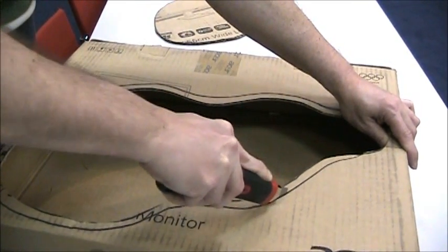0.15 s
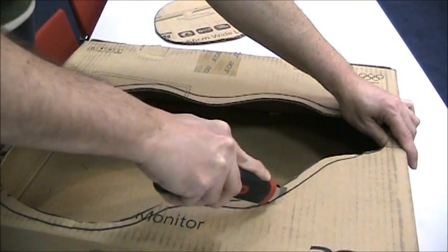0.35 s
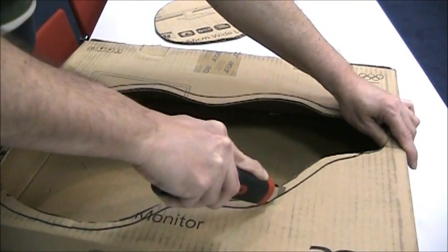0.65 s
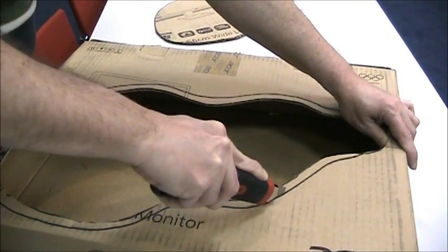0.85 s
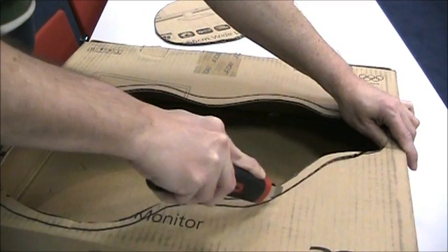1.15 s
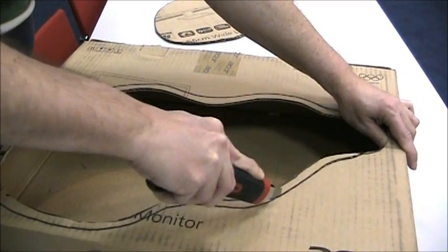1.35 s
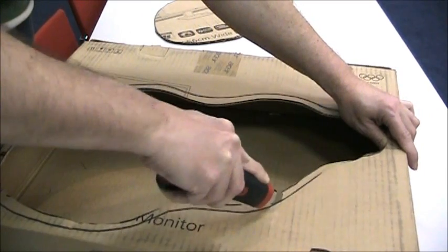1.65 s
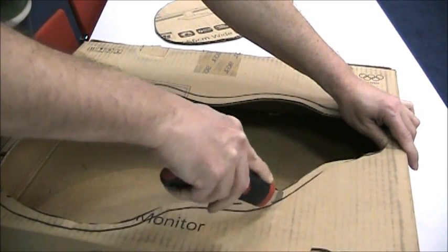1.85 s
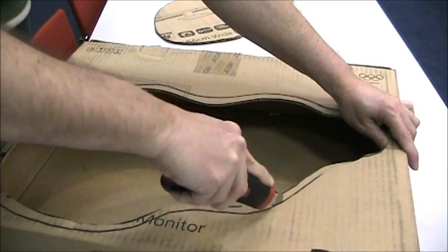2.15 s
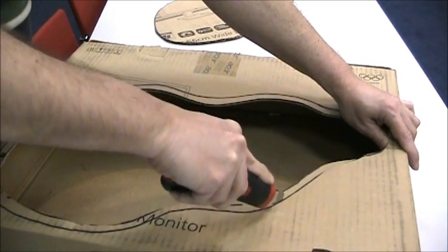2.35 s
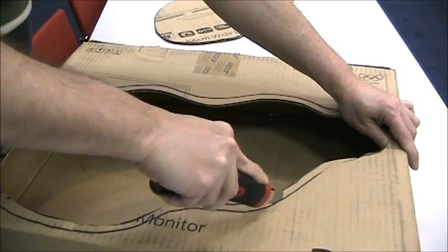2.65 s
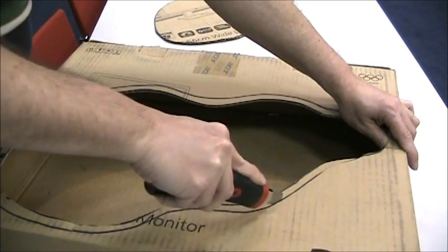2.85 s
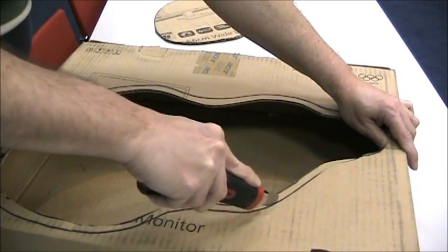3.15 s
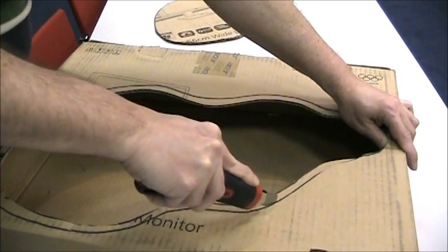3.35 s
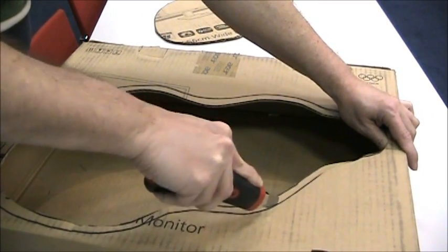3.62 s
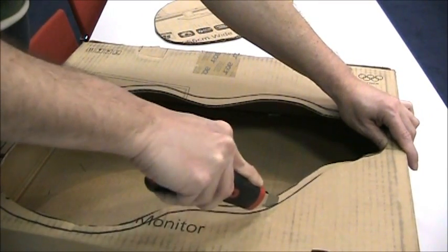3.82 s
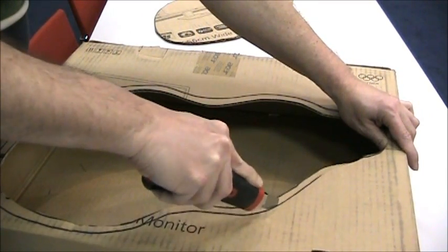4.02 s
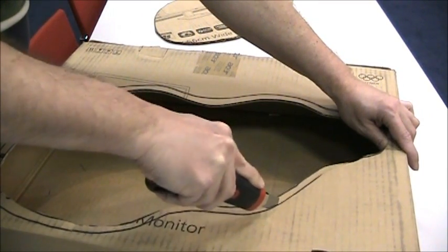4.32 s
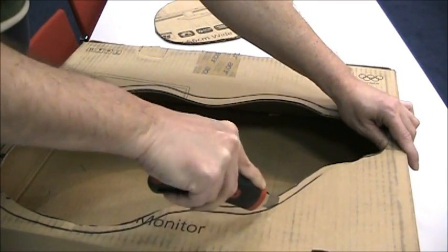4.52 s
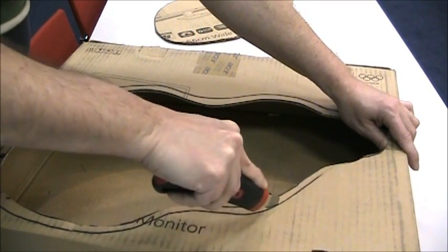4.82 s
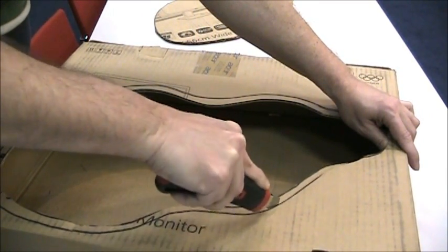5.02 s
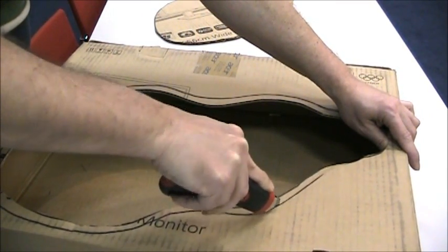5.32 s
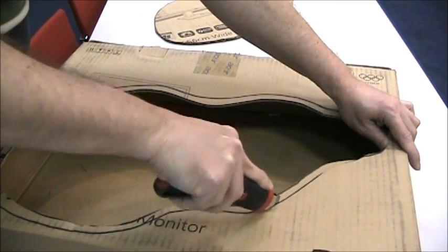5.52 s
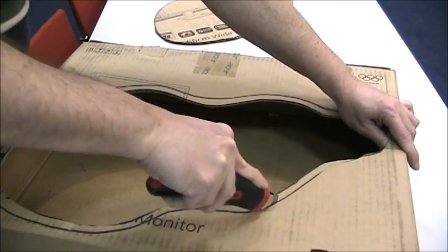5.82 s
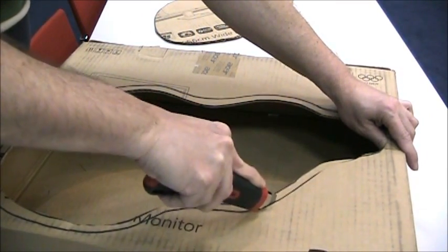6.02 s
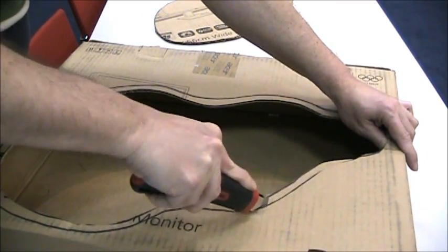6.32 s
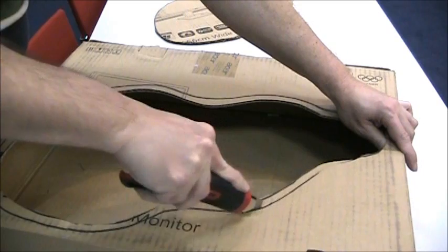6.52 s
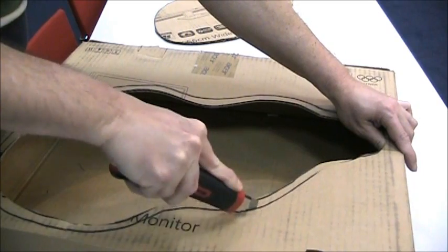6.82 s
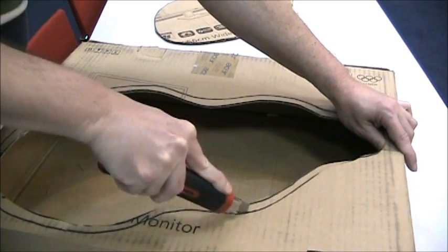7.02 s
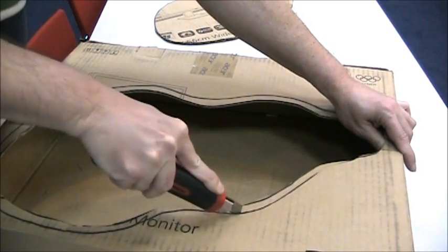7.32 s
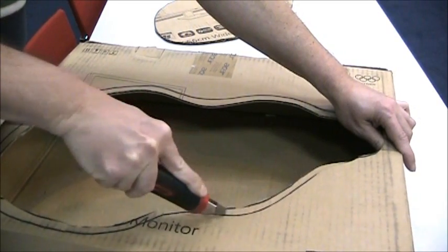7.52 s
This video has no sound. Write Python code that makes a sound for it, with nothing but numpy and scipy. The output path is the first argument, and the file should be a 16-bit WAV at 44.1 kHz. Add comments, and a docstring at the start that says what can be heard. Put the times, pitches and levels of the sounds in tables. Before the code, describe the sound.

Small snaps and creaks as a blade works through a big hollow cardboard box, then louder ripping strokes and deep thuds near the end.

```python
"""A small room, a stereo microphone held close to a large, hollow corrugated cardboard box.
A utility knife saws into it: dense random ruptures of paper fibre rasp, hiss and ring the box's modes.
Flute walls crack (noise bursts) and thump (decaying box modes); torn strips twang, the wedged blade groans.
Hands flex the board (fibre ruptures through a low colour) over room air, hum, a thin electrical whine,
and wavering recorder hiss and low rumble that follow the recorder's gain. The loudest peaks are rounded."""
import sys
import numpy as np
from scipy import signal
from scipy.fft import rfft, irfft, next_fast_len
from scipy.io import wavfile

SR = 44100
rng = np.random.default_rng(int(sys.argv[2]) if len(sys.argv) > 2 else 0)


def transcribe(signal):
    """Save signal, clipped to [-1, 1], as a 16-bit WAV file at the path in sys.argv[1]."""
    frames = np.atleast_2d(signal).T
    limited = np.clip(frames, -1, 1)
    pcm = np.round(limited * 32767).astype(np.int16)
    wavfile.write(sys.argv[1], SR, pcm)


N = 338247
TIME = np.arange(N) / SR

# modes of the panels and cavity: (frequency [Hz], relative level [dB], T60 of the free ring [s])
BOX_MODES = [(144.3, -2.5, 0.13), (173.6, -9, 0.22), (191.3, -3.5, 0.13), (237.6, 1.5, 0.09),
             (298.7, -3, 0.16), (339, -13, 0.15), (397.6, -2, 0.12), (448.3, -0.5, 0.088), (538, 4, 0.029),
             (589, -1, 0.057), (659, 1.5, 0.058), (726, 6.5, 0.033), (819.7, -2.5, 0.062), (934, -1, 0.036),
             (1126, -12, 0.038), (1291, -11, 0.052)]
# colour of breaking fibres: (frequency [Hz], relative density [dB per Hz])
CRACK_COLOUR = [(300, -13.5), (1000, 1), (2000, 4.5), (3000, -4.5), (5000, -2), (8000, -1.5), (11000, -6),
                (15500, -14)]
# the blade forces a flute wall ever harder until it gives:
# (start [s], break [s], tearing at the break [dB], thump peak [dB])
SURGES = [(2.996, 3.005, -29.5, -12), (6.134, 6.158, -18.5, -7), (6.453, 6.464, -27, -32),
          (6.498, 6.532, -22, -7.5), (6.92, 6.94, -20, -5), (6.957, 6.973, -24.5, -20),
          (7.41, 7.424, -11.5, -10), (7.449, 7.463, -13.5, -5.5)]
# flexing of the held board, and recorder hiss rising and falling with the recorder's gain:
# (time [s], flexing level ahead of flex_db [dB], hiss level ahead of hiss_db [dB])
FLEX_AND_HISS = [(0.0, -40.5, -54), (0.83, -43.5, -52), (1.15, -38, -49.5), (1.75, -41.5, -53),
                 (2.22, -43, -52), (2.88, -36.5, -50.5), (3.27, -39, -51.5), (3.5, -35, -50.5),
                 (4.64, -38.5, -47), (4.93, -37.5, -58.5), (5.94, -47, -58.5), (6.3, -41, -56),
                 (6.86, -40.5, -55.5), (7.01, -49, -55), (7.18, -43.5, -55), (7.37, -36.5, -47),
                 (7.54, -39, -55), (7.67, -34.5, -46)]


def amp(db):
    """Decibels to gain."""
    return 10 ** (np.asarray(db) / 20)


def rms_one(x):
    """Scale to unit power."""
    return x / np.sqrt(np.mean(x ** 2) + 1e-20)


def at_hz(points, hz):
    """Read a table on a log-frequency axis."""
    points = np.array(points)
    return np.interp(np.log(np.maximum(hz, 1)), np.log(points[:, 0]), points[:, 1])


def level(rows, column=1):
    """Gain over time from a dB column, practically silent outside the rows."""
    rows = np.array(rows)
    return amp(np.interp(TIME, rows[:, 0], rows[:, column], left=-120, right=-120))


def add(track, s, sound):
    """Mix a short sound into a track at s seconds."""
    start = int(np.clip(s * SR, 0, N - 1))
    track[start:start + len(sound)] += sound[:N - start]


def drift(rate):
    """Random motion with spread 1, through a new random value rate times a second."""
    knots = rng.standard_normal(N // 8)
    return rms_one(np.interp(TIME * rate, np.arange(len(knots)), knots))


def decay(t, t60):
    """Exponential decay by 60 dB in t60 seconds."""
    return np.exp(-np.log(1000) * t / t60)


def colour(x, spectrum, size=4096):
    """Causal (minimum-phase) filter with the given spectrum, by folding its cepstrum."""
    log_gain = np.log(amp(at_hz(spectrum, np.fft.rfftfreq(size, 1 / SR))))
    cepstrum = irfft(log_gain)
    cepstrum[1:size // 2] *= 2
    cepstrum[size // 2 + 1:] = 0
    impulse = irfft(np.exp(rfft(cepstrum)))
    return signal.oaconvolve(x, impulse)[:len(x)]


def noise(spectrum):
    """Steady noise of the given colour, unit power."""
    return rms_one(colour(rng.standard_normal(N), spectrum))


def diffuse(mid, side):
    """Stereo pair from two unrelated sounds: narrow in the bass, wide above."""
    # share of the side signal: (frequency [Hz], gain [dB])
    side_share = [(100, -17), (300, -5.5), (700, -2), (1500, 4.5), (5000, 2), (14000, -2.5)]
    return mid + colour(side, side_share) * np.array([[1], [-1]])


def fibres(per_s, spread_db):
    """Randomly timed ruptures of uneven strength and either sign, unit power."""
    sizes = amp(spread_db * np.minimum(rng.exponential(1, N), 4)) * rng.choice([-1, 1], N)
    return rms_one(sizes * (rng.random(N) < per_s / SR))


def background(air_db=-54, hum_hz=120, hum_db=-53, whine_db=-67):
    """Quiet room air as diffuse noise, a low hum and a thin electrical whine as steady sines."""
    # colour of the room air: (frequency [Hz], relative density [dB per Hz])
    air_colour = [(20, -37), (50, 0), (80, -19), (100, -10), (135, 0.5), (180, -0.5), (400, -13.5),
                  (800, -6), (1300, -20.5), (3000, -23.5), (8000, -30), (15500, -44)]
    whine_hz = 15734
    air = amp(air_db) * diffuse(noise(air_colour), noise(air_colour))
    hum = amp(hum_db) * rms_one(np.sin(2 * np.pi * hum_hz * TIME))
    whine = amp(whine_db) * rms_one(np.sin(2 * np.pi * whine_hz * TIME))
    return air + hum + whine


def rumble(rumble_db=4.5):
    """Low rumble around 60 to 125 Hz as shaped noise, its level following the recorder's gain."""
    # (time [s], level ahead of rumble_db [dB])
    rumble_level = [(0.0, -55.5), (1.24, -51), (1.6, -59), (2.65, -51.5), (4.53, -48.5), (4.76, -59),
                    (5.55, -65), (7.37, -56), (7.48, -51), (7.67, -57)]
    # (frequency [Hz], relative density [dB per Hz])
    rumble_colour = [(20, -34), (42, -31), (60, 7.5), (76, 10.5), (100, 2), (125, 11), (180, -21),
                     (500, -47)]
    return level(rumble_level) * amp(rumble_db) * noise(rumble_colour)


def recorder_hiss(hiss_db=-0.5, tick_db=-4.0, waver_db=3.75):
    """Wide, wavering noise that rises and falls with the recorder's gain, with stray ticks in it."""
    # (frequency [Hz], relative density [dB per Hz])
    floor_colour = [(500, 1), (1200, 8.5), (2200, 3.5), (3000, 2), (5000, 0), (8500, -2.5), (12000, -9.5),
                    (15500, -12.5)]
    hiss = amp(hiss_db) * diffuse(noise(floor_colour), noise(floor_colour))
    # the ticks come in clumps
    clumps = amp(3.0 * drift(25) + 5.0 * drift(180))
    grains = fibres(per_s=700, spread_db=3.5) * clumps
    ticks = amp(tick_db) * rms_one(colour(grains, CRACK_COLOUR))
    waver = amp(waver_db * (drift(22) - .5))
    return level(FLEX_AND_HISS, 2) * waver * (hiss + ticks)


def flexing(flex_db=-0.5):
    """The held board groans all over its surface as it flexes: wavering fibre ruptures, mostly low."""
    # (frequency [Hz], relative density [dB per Hz])
    flex_colour = [(60, -20.5), (100, -12), (135, 3), (200, -0.5), (290, -3), (345, -9), (440, -3.5),
                   (560, -12), (740, -11), (950, -15.5), (1400, -25), (2200, -25), (3500, -37.5)]
    waver = amp(1.8 * drift(30))
    strains = [fibres(per_s=2500, spread_db=2.5) for _ in range(2)]
    flex = diffuse(*[rms_one(colour(strain, flex_colour)) for strain in strains])
    return level(FLEX_AND_HISS) * amp(flex_db) * waver * flex


def stroke(bite_s, end_s, attack_s):
    """Envelope of one stroke: the blade bites in, holds, lets go and drags on a little in the slit."""
    attack_rise_db = 22.5   # gained over the attack
    release_s, drag_s = 0.0083, 0.029   # time constants
    drag = amp(-8)
    rise = amp(attack_rise_db * np.clip((TIME - bite_s) / attack_s, -10, 0))
    after = np.clip(TIME - end_s, 0, 1)
    return rise * ((1 - drag) * np.exp(-after / release_s) + drag * np.exp(-after / drag_s))


def box(force, tilt_db=3.0):
    """The box's modes, as resonators, ring under a steady force, higher ones more readily; unit power."""
    out = np.zeros(N)
    for k, (hz, db, t60) in enumerate(BOX_MODES):
        r = amp(-60 / (t60 * SR))   # pole radius
        w = 2 * np.pi * hz / SR
        gain = (-1) ** k * amp(db + tilt_db * np.log2(hz))
        # the tiny offset keeps the filter off denormal numbers
        out += gain * signal.lfilter([1, 0, -1], [1, -2 * r * np.cos(w), r * r], force + 1e-18)
    return rms_one(out)


def sawing(hiss_db=0.5, surge_start=0.28, catch_db=1.14):
    """The blade rips fibres in a dense, catching stream that rasps, hisses and shakes the box."""
    # sawing strokes: (full bite [s], end [s], attack [s], tearing [dB],
    # drive into the box over the tearing [dB], edge hiss over the tearing, ahead of hiss_db [dB])
    strokes = [(0.002, 0.007, 0.0057, -46.5, 14, -5), (0.254, 0.264, .01, -52, 9, -5),
               (0.421, 0.469, 0.0088, -34.5, 5.5, -4.5), (0.554, 0.556, .02, -41, 9.5, -3),
               (0.608, 0.658, .01, -53, 7, 1),           (1.056, 1.093, 0.095, -29, 8, -1.5),
               (1.135, 1.158, .03, -42.5, 8.5, -5), (1.388, 1.443, .09, -39.5, -3, 5.5),
               (2.367, 2.433, .02, -44, 6, -2.5), (2.929, 2.994, 0.11, -23, 7.5, -3),
               (3.421, 3.475, 0.032, -31.5, 0, -1), (3.606, 3.624, 0.061, -39, 12, -8),
               (3.968, 4.07, 0.034, -44, 8, -2.5), (4.24, 4.265, .04, -54, -6, 8.5),
               (4.349, 4.378, .01, -37.5, -2, -7.5), (4.67, 4.696, 0.033, -52, 2, 6),
               (6.097, 6.163, 0.036, -29, 6.5, -2), (6.386, 6.406, .02, -46.5, 7, -6),
               (6.452, 6.534, 0.016, -27.5, 8, -1), (6.54, 6.575, .02, -31.5, 4, -5.5),
               (6.861, 7.007, 0.013, -32.5, 4.5, -1.5), (6.926, 6.938, .03, -16, -3, -3),
               (7.079, 7.113, 0.088, -24.5, 3.5, -3), (7.13, 7.136, .006, -25.5, 3, -2.5),
               (7.344, 7.385, 0.049, -35.5, 4.5, -4), (7.392, 7.561, .004, -21.5, 2, -3.5),
               (7.662, 7.68, 0.046, -31.5, 2, -6)]
    # rasp of the liner, hiss at the blade's edge: (frequency [Hz], relative density [dB per Hz])
    rasp_colour = [(300, -26.5), (650, 6.5), (850, 10), (1400, -2.5), (1700, 2.5), (1950, 8.5), (2100, 4),
                   (2300, 8), (2500, 1), (2800, 1), (4000, -14), (7000, -21), (15000, -38.5)]
    hiss_colour = [(1500, -23.5), (3200, -7.5), (5000, -9.5), (6300, -10), (7400, -4.5), (8400, -3.5),
                   (10500, -11), (12500, -10.5), (15500, -24.5)]

    effort, edge, drive = np.zeros((3, N))
    for bite_s, end_s, attack_s, db, grip_db, edge_db in strokes:
        push = amp(db) * stroke(bite_s, end_s, attack_s)
        effort = np.maximum(effort, push)
        edge = np.maximum(edge, amp(edge_db) * push)
        drive = np.maximum(drive, amp(grip_db) * push)
    for start, stop, db, _ in SURGES:
        surge = amp(db) * np.interp(TIME, [start, stop], [surge_start, 1], left=0, right=0)
        effort += surge
        edge += surge
        drive += surge

    ruptures = fibres(per_s=4500, spread_db=3.5) * amp(2.8 * drift(450))
    # bundles of fibres hold, then go together
    ruptures = ruptures * amp(catch_db * (drift(90) - 2.4))
    rasp = effort * rms_one(colour(ruptures, rasp_colour))
    edge_noise = ruptures + .5 * rng.standard_normal(N)
    hiss = amp(hiss_db) * edge * rms_one(colour(edge_noise, hiss_colour))
    # the heavy panels follow the blade 4.4 ms late
    lag = np.exp(-1 / (0.0044 * SR))
    shake = signal.lfilter([1 - lag], [1, -lag], drive) * box(ruptures)
    return rasp + hiss + shake


def strays(count=60, per_s=4):
    """Rows like those of the snaps, for faint stray fibres at random times, set against the hiss level."""
    over_hiss_db, spread_db = -4.5, 7.5
    bright_db, t60_s, thump_over_crack_db = 20, 0.031, -3.5
    times = np.cumsum(rng.uniform(.2, 1.8, count)) / per_s
    chance = rng.standard_normal((count, 2))
    rows = np.array(FLEX_AND_HISS)
    levels = np.interp(times, rows[:, 0], rows[:, 2]) + over_hiss_db + spread_db * chance[:, 0]
    return [(s, db, bright_db + spread_db * tilt, t60_s, db + thump_over_crack_db)
            for s, db, tilt in zip(times, levels, chance[:, 1]) if s < N / SR]


def crack(bright_db, t60, scatter_db=-3.0, tail_db=-27, tail_s=0.031, rise_s=0.000055,
          neutral_db=2.0, size=5000):
    """A bundle of fibres breaks in a noise burst, stragglers follow as a faint tail; unit power over 10 ms."""
    t = np.arange(size) / SR
    fade = decay(t, t60) + amp(tail_db) * np.exp(-t / tail_s)
    burst = rng.standard_normal(size) * fade * (1 - np.exp(-t / rise_s))
    tone = []
    for hz, db in CRACK_COLOUR:
        tilt_db = (bright_db - neutral_db) * np.log2(np.clip(hz, 1500, 8000)) / 2
        tone.append((hz, db + tilt_db + scatter_db * rng.standard_normal()))
    sound = colour(burst, tone)
    return sound / np.sqrt(np.sum(sound ** 2) / (.01 * SR))


def thump(centre_hz, focus_db=1.0, scatter_db=1.5, swell_cycles=0.61, hold=0.96, size=12000):
    """The board springs back: the liner near the cut answers first, slow panels swell later. Peak 1."""
    t = np.arange(size) / SR
    hz, db, t60 = np.array(BOX_MODES).T[:, :, None]
    off_centre = np.log2(hz / centre_hz)   # octaves
    strength = amp(db - focus_db * off_centre ** 2 + scatter_db * rng.standard_normal(hz.shape))
    # the pressing hand shortens the ring
    envelope = (1 - np.exp(-t * hz / swell_cycles)) * decay(t, hold * t60)
    modes = np.sin(2 * np.pi * (hz * t + rng.random(hz.shape)))
    sound = np.sum(strength * envelope * modes, axis=0)
    return sound / np.abs(sound).max()


def snapping(thump_db=5.5, release_hz=260, strain_db=-13.0, strain_s=0.002, size=500):
    """Fibres strain just before a wall gives way; then it cracks and the board springs back."""
    # flutes snapping: (time [s], crack level over 10 ms [dB], brightness [dB], crack T60 [s],
    # thump peak ahead of thump_db [dB])
    snaps = [(0.092, -47, -1, .014, -38), (0.3388, -48, 14, .019, -53), (0.4194, -24.5, 4, 0.054, -52),
             (0.778, -42, 9, .014, -34), (0.9277, -26, 8, 0.065, -33), (1.0077, -28, 3, 0.017, -19),
             (1.286, -39.5, 6, 0.039, -33), (1.3913, -28, 2, .05, -28), (1.4046, -18, 7, 0.014, -17),
             (1.633, -47, -7, 0.013, -34), (1.7095, -39.5, 9, 0.029, -50), (1.8621, -44, -17, .03, -53),
             (1.9073, -44, 2, 0.038, -36), (2.149, -26.5, -6.5, 0.025, -15), (2.374, -29, -3, 0.053, -17.5),
             (2.4154, -32, -6, 0.023, -14.5), (2.6214, -29.5, -1, .022, -18),
             (2.7036, -30, -2.5, 0.027, -13), (3.134, -34, -14, .03, -30.5), (3.3003, -37, -17, 0.042, -33),
             (3.39, -31.5, 7, .027, -36.5), (3.4088, -30, 1, 0.028, -41), (3.465, -21, -1, 0.056, -22),
             (3.5594, -24, 0, 0.031, -48), (3.8222, -35.5, -3, 0.098, -33), (3.945, -35.5, -4, .024, -27.5),
             (3.9579, -34, -4, 0.016, -32), (3.9885, -45, -15, 0.018, -22.5), (4.0296, -36, -5, .024, -24),
             (4.0773, -24.5, 3.5, 0.018, -29), (4.1852, -34.5, 15, 0.033, -54), (4.221, -40, -9, .024, -47),
             (4.3309, -28.5, -1.5, 0.04, -25.5), (4.379, -37, 2, 0.024, -42),
             (4.5885, -32, -5.5, 0.017, -47), (4.6222, -25.5, -1, 0.022, -30),
             (4.7771, -27, 11, 0.013, -27), (4.7813, -13, 7.5, 0.015, -14), (5.0128, -25, 4, 0.038, -18.5),
             (5.022, -19, 6, 0.014, -14.5), (5.0784, -34, -10, .026, -28.5), (5.1967, -48, 2, .017, -27),
             (5.2175, -41.5, -3, 0.014, -33), (5.2641, -15.5, 10, 0.014, -18),
             (5.562, -30.5, -3.5, 0.0094, -19), (5.696, -39, -8, .023, -30.5),
             (5.9895, -48, 10, 0.013, -40.5), (6.807, -37, 7, 0.23, -37), (6.8586, -35, 19, .023, -30),
             (7.1277, -21.5, -1, 0.015, -13), (7.2548, -40.5, 9, 0.0064, -34),
             (7.3945, -17.5, -1, .021, -13.5)]
    # a harder crack springs the stiffer, higher panels
    middling_thump_hz, middling_crack_db, crack_db_per_octave = 470, -34.5, 25
    # brittle, bright breaks let the board ring for less time
    plain_hold, bright_db_per_halving = 0.91, 16.5   # hold: share of the free ring

    out = np.zeros(N)
    t = np.arange(size) / SR
    for s, db, bright_db, t60, body_db in list(snaps) + strays():
        body_hz = middling_thump_hz * 2 ** ((db - middling_crack_db) / crack_db_per_octave)
        hold = plain_hold * .5 ** (max(bright_db, 0) / bright_db_per_halving)
        fibre_noise = rms_one(colour(rng.standard_normal(size), CRACK_COLOUR))
        strain = fibre_noise * np.exp(-t[::-1] / strain_s)   # grows up to the break
        add(out, s - size / SR, amp(db + strain_db) * strain)
        add(out, s, amp(db) * crack(bright_db, t60))
        add(out, s - .0005, amp(body_db + thump_db) * thump(body_hz, hold=hold))
    # walls forced by the blade: the thump starts 3 ms ahead of the break
    for _, stop, _, body_db in SURGES:
        add(out, stop - .003, amp(body_db) * thump(release_hz))
    return out


def twanging(size=2000):
    """Strips of liner twang briefly as they tear free: decaying sines, too small to fill the room."""
    # (time [s], pitch [Hz], starting level [dB], T60 [s])
    twangs = [(0.93, 2320, -27, 0.059), (1.405, 2980, -16.5, 0.034), (4.332, 3820, -13, 0.0068),
              (4.528, 3630, -27.5, 0.018), (4.589, 3620, -25.5, 0.013), (5.014, 6350, -22, .018),
              (5.0224, 8350, -0.5, 0.0075), (5.265, 5150, -5, 0.0063), (5.265, 6800, -2.5, 0.0062),
              (5.561, 4000, -29, 0.015), (5.696, 3900, -30.5, .015)]
    out = np.zeros(N)
    t = np.arange(size) / SR
    for s, hz, db, t60 in twangs:
        add(out, s, amp(db) * np.sin(2 * np.pi * hz * t) * decay(t, t60))
    return out


def groaning(jitter=0.051, build_db=20.5, liner_hz=500, liner_t60=0.0042, lowest_hz=170, size=900):
    """The wedged blade sticks and slips ever harder, each slip a soft, quickly damped push on the liner."""
    # (start [s], end [s], slips per second [1/s], level built up to, ahead of the gain in scene() [dB])
    groans = [(2.36, 2.365, 210, -19), (4.727, 4.754, 310, -14)]
    out = np.zeros(N)
    t = np.arange(size) / SR
    push = np.sin(2 * np.pi * liner_hz * t) * decay(t, liner_t60) * (1 - np.exp(-t * liner_hz))
    # the liner radiates no deep bass
    push = signal.sosfilt(signal.butter(2, lowest_hz, "high", fs=SR, output="sos"), push)
    push /= np.abs(push).max()
    for start, end, per_s, db in groans:
        for s in np.arange(start, end, 1 / per_s):
            slip_db = db - build_db * (end - s) / (end - start)
            add(out, s + jitter / per_s * rng.standard_normal(), amp(slip_db) * push)
    return out


def room(x, first_s=0.00727, size=30000):
    """Diffuse reflections, different at each side, dying band by band as filtered noise tails."""
    # reverberation: (frequency [Hz], T60 [s])
    room_t60 = [(150, 1), (700, 0.53), (2500, 0.38), (6000, 0.65), (14000, 0.2)]
    t, tail = np.arange(size) / SR, 0
    edges = np.geomspace(90, 17000, 9)
    for low, high in zip(edges, edges[1:]):
        bandpass = signal.butter(2, [low, high], "band", fs=SR, output="sos")
        band = signal.sosfilt(bandpass, rng.standard_normal((2, size)))
        tail = tail + band * decay(t, at_hz(room_t60, np.sqrt(low * high)))
    tail = rms_one(tail * (t > first_s)) / np.sqrt(size)
    # colour of the reflections: (frequency [Hz], gain [dB])
    x = colour(x, [(150, -1.0), (700, 4.5), (2000, -0.5), (6000, -1.5), (14000, -71.0)])
    return diffuse(*[signal.oaconvolve(x, side)[:N] for side in tail])


def ports(x, lag_us=5.3, size=90):
    """Two close capsules: unlike colours, arrivals and treble reflections off the housing."""
    # left minus right: (frequency [Hz], level [dB])
    balance = [(200, -.4), (700, -.7), (2000, .3), (5000, -1), (8500, -1.2), (13000, 2.5)]
    # housing reflections: (frequency [Hz], gain [dB])
    housing = [(200, -26), (1000, -21), (5000, -20), (9000, -15), (13000, -9)]
    scatter = rms_one(rng.standard_normal(size)) / np.sqrt(size)
    glance = colour(signal.oaconvolve(x, scatter)[:N], housing)
    left = colour(x + glance, [(hz, db / 2) for hz, db in balance])
    right = colour(x - glance, [(hz, -db / 2) for hz, db in balance])
    # the right capsule hears it a few microseconds later
    padded = next_fast_len(N)
    delay = np.exp(-2j * np.pi * np.fft.rfftfreq(padded, 1 / SR) * lag_us * 1e-6)
    return np.array([left, irfft(rfft(right, padded) * delay, padded)[:N]])


def scene(saw_wet_db=-25.0, snap_wet_db=-19.5, groan_db=5.0):
    """Knife and box, heard close up in the room, over the hiss and rumble."""
    saw = sawing() + amp(groan_db) * groaning()
    snaps = snapping()
    direct = ports(saw + snaps + twanging())
    reflections = room(amp(saw_wet_db) * saw + amp(snap_wet_db) * snaps)
    return direct + reflections + flexing() + recorder_hiss() + rumble() + background()


def record(dry):
    """The microphone rounds the peaks (tanh) and the top is cut by a steep low-pass."""
    top, cutoff_hz = 1.2, 16200   # top: ceiling of the rounding, full scale is 1
    rounded = top * np.tanh(dry / top)
    return signal.sosfilt(signal.ellip(10, .1, 80, cutoff_hz, fs=SR, output="sos"), rounded)


dry = scene()
out = record(dry)
transcribe(out)
```